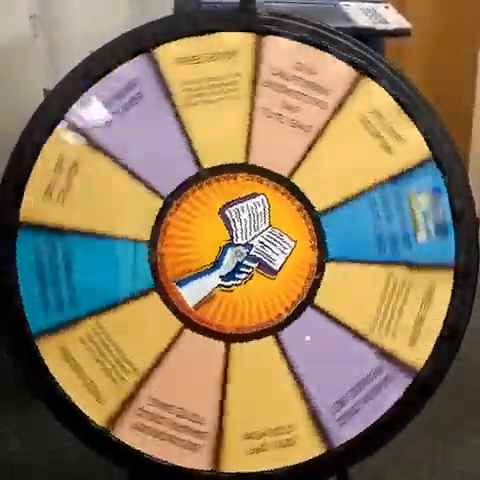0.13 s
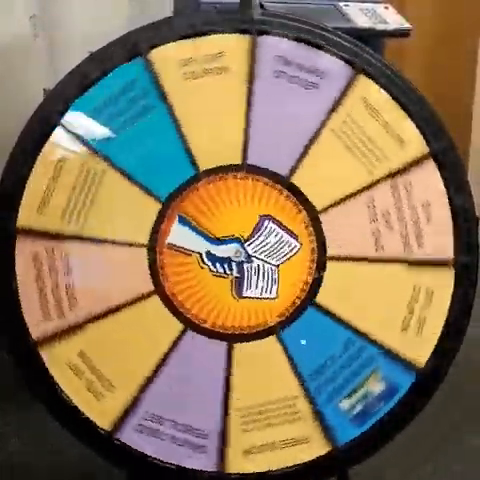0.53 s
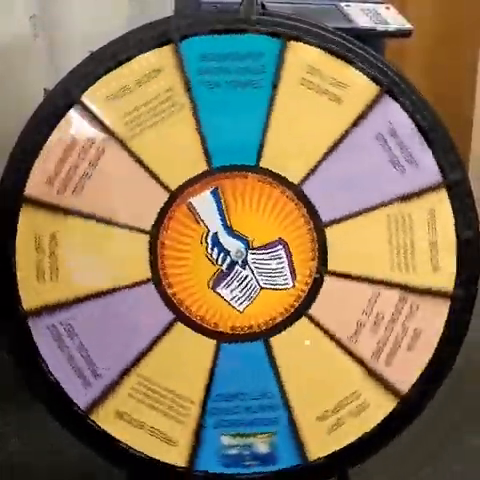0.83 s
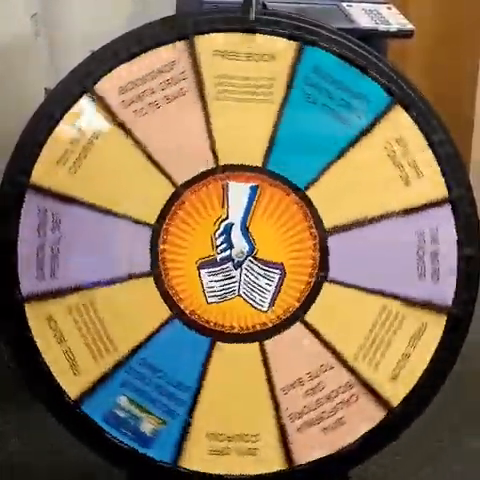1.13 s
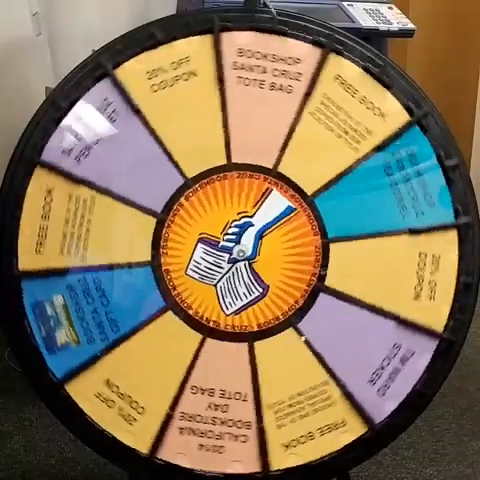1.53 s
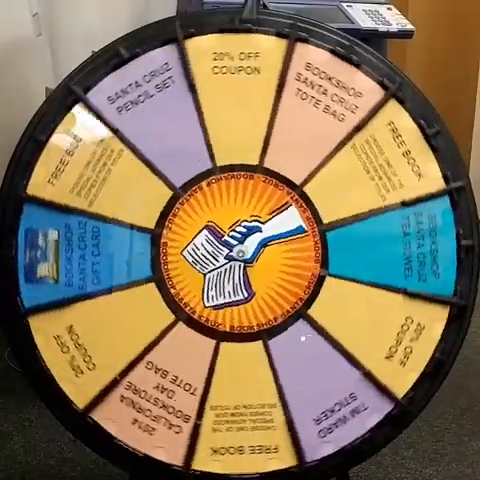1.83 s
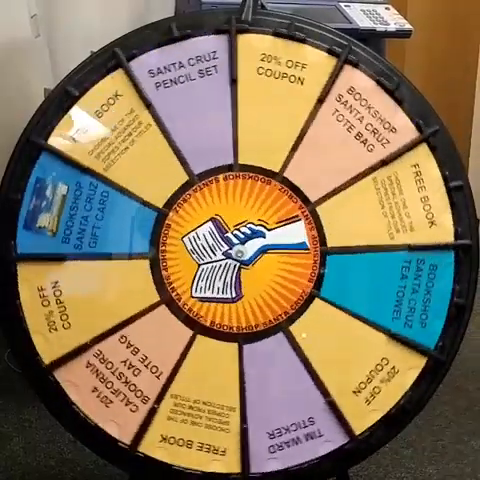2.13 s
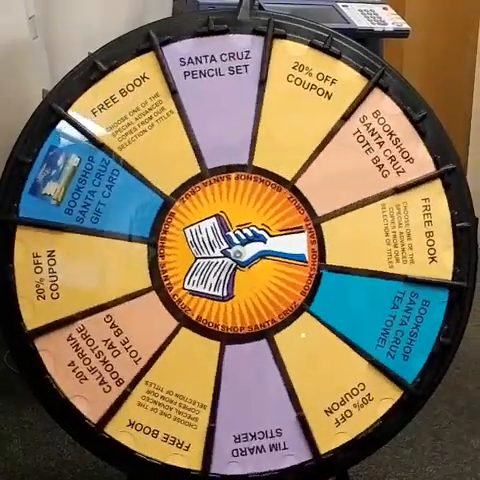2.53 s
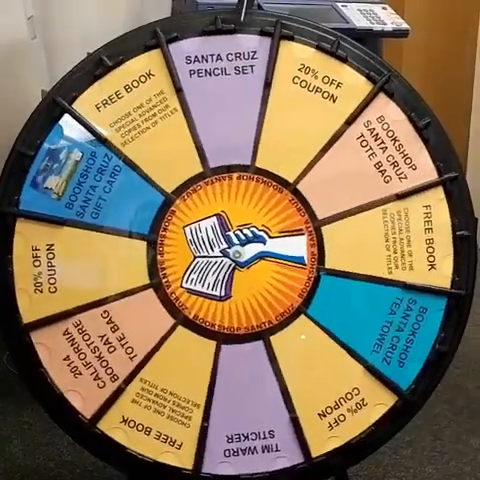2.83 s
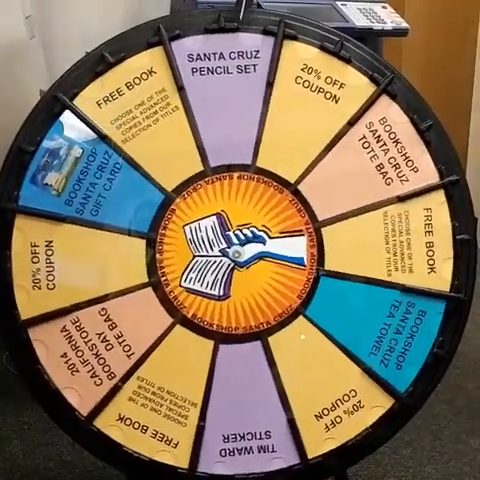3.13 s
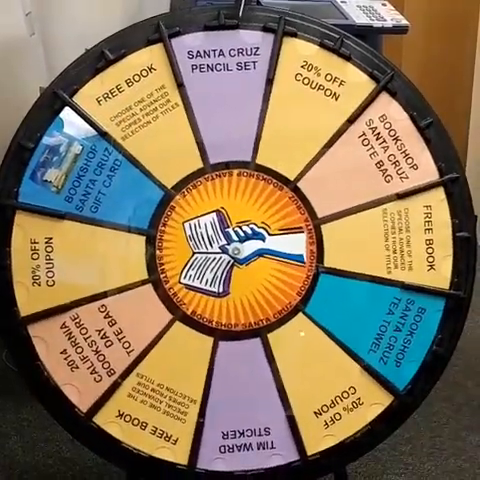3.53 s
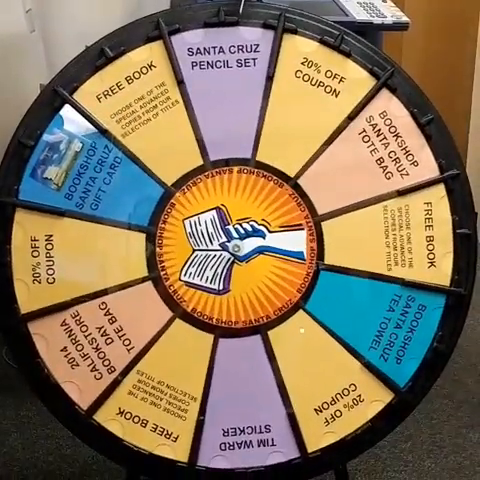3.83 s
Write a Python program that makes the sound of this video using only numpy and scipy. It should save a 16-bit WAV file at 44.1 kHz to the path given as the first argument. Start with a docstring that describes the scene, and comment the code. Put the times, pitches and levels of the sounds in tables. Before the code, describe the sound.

Prize wheel clacking about eleven times a second, slowing to single weakening ticks with boinging twangs, then near silence with faint hand rubs; close stereo microphones, left side muffled and right bright, over low room rumble.

```python
"""Prize wheel coasting to rest

In a small, hard room each peg strikes a plastic flapper, which bounces once, bends, slips off with a tick and twangs.
Contacts are shaped noise bursts with reverberation; the twang is two damped sines with wall echoes. Strikes weaken
as the wheel slows, while the twang, after softer first ones, stays about as strong: the bend is always the same.
Bearing and air rumble are filtered noise; soft low thumps, a dull knock and faint handling complete the scene.
The left of the two microphones is muffled."""
import sys
import numpy as np
from scipy import signal
from scipy.fft import rfft, irfft, next_fast_len
from scipy.io import wavfile

SR = 44100
rng = np.random.default_rng(int(sys.argv[2]) if len(sys.argv) > 2 else 0)


def waveform_to_disk(signal):
    """Save audio, clipped to [-1, 1], as 16-bit WAV at the path in sys.argv[1]."""
    frames = np.transpose(np.atleast_2d(signal))
    scaled = np.clip(frames, -1, 1) * 32767
    samples = np.round(scaled).astype(np.int16)
    wavfile.write(sys.argv[1], SR, samples)


N = 176400

# Levels of events and spectra are relative: room, spectrum and microphones still act on them.
# Flapper meeting each peg: strike [t/s, level/dB], bounce [delay/s, level/dB]
PEG_STRIKES = [(-.055, -5.5, 0.013, -19), (0.028, -14, .014, -11), (.1135, -17, 0.0075, -12),
               (0.2019, -13.5, 0.0079, -13.5), (.2935, -12.5, .014, -12.5), (.3895, -13, 0.013, -14.5),
               (.504, -16.5, 0.018, -19), (.607, -17.5, 0.0095, -18.5), (0.7164, -23, 0.016, -18.5),
               (0.844, -20, 0.017, -29), (.964, -21, 0.012, -22), (1.091, -20, .014, -25.5),
               (1.230, -17.5, 0.012, -44), (1.3738, -20.5, 0.014, -20.5), (1.537, -21.5, 0.017, -20.5),
               (1.735, -20.5, .015, -23), (1.965, -29.5, .0165, -22.5), (2.288, -38, 0.016, -29.5)]
# Flapper slipping off each peg [t/s, tick level/dB, twang level/dB]
PEG_RELEASES = [(.012, -55, -10), (.098, -31, -14), (.189, -34, -14), (.272, -30, -5.5), (.365, -33, -12),
                (.456, -27, -3.5), (.557, -30, -3), (.664, -24.5, -5), (.774, -23.5, -6), (.895, -24.5, -5),
                (1.021, -23.5, -5.5), (1.160, -26.5, -4.5), (1.302, -29, -4), (1.466, -33.5, -5.5),
                (1.643, -30, -4.5), (1.851, -25.5, -5), (2.113, -30, -5.5), (2.548, -24.5, -5)]
# Dull knocks as the wheel settles [t/s, level/dB]
SETTLING_KNOCKS = [(3.1465, -34.5), (3.251, -56), (3.537, -47), (3.633, -50.5)]
# Bending modes of the flapper before detuning [f/Hz, level/dB, attack/s, hold/s, t60/s]
FLAPPER_MODES = [(625.2, -20, .004, 0.0038, 0.058), (301, -26, 0.011, 0.0033, 0.038)]
# Drive of each mode by a strike, relative to the strike [mode 1 level/dB, mode 2 level/dB]
STRIKE_DRIVE_DB = (-3, 5)
# Wall echoes of the twang [delay/s, level/dB]
WALL_ECHOES = [(.038, -14.5), (.060, -13.5)]
# Light brushes of a hand [t/s, level/dB, attack/s, hold/s, t60/s, treble tilt/(dB per octave)]
HAND_BRUSHES = [(2.40, -65, 0.011, .03, .1, 3), (3.09, -66, 0.034, .02, .1, 1),
                (3.175, -57.5, .01, .02, .1, 3), (3.334, -76, 0.054, .08, .3, -2),
                (3.471, -67.5, 0.061, .07, 0.25, 0.5), (3.575, -63, .01, 0.0085, .1, 3),
                (3.694, -62.5, 0.0031, 0.0066, 0.06, 10.5), (3.823, -52.5, 0.014, 0.015, 0.069, 5.5),
                (3.904, -60, 0.0056, 0.016, 0.1, 2.5)]
# Soft low thumps [t/s, level/dB]
LOW_THUMPS = [(0.227, -34.5), (1.069, -43), (1.673, -42), (2.303, -37)]
# Spectra of strike, tick, knock and hand brush [f/Hz, level/dB]
STRIKE_SPECTRUM = [(100, -22.5), (300, -24), (700, 2.5), (950, -10), (1300, -1.5), (1900, -7.5), (2600, -2),
                   (3100, -4), (3800, 1), (5000, -3), (7000, 2.5), (10400, -5), (11600, 3.5), (15500, -7.5)]
TICK_SPECTRUM = [(200, -10.5), (1000, 1), (1400, 4), (1800, 4.5), (2050, 6), (2400, -2.5), (3500, -0.5),
                 (5000, -1), (6100, 1.5), (7700, 2.5), (10400, -8.5), (15500, -9.5)]
KNOCK_SPECTRUM = [(150, 0), (450, 11.5), (720, 12), (1050, 17), (1500, 0.5), (2200, 5.5), (2700, 2),
                  (3600, -0.5), (7000, -5.5), (10400, -13.5), (15500, -29)]
BRUSH_SPECTRUM = [(300, 26), (1500, 7), (4000, 0), (8000, -0.5), (15500, -12.5)]
# Spectra of ventilation and of the turning wheel's rumble [f/Hz, level/dB]
AIR_SPECTRUM = [(20, -52), (40, -24), (58, 3), (85, -0.5), (135, 1.5), (280, -4), (600, -2), (850, -12),
                (1200, -18), (2500, -33.5), (6000, -38.5), (15500, -46.5)]
AXLE_SPECTRUM = [(20, -47.5), (40, -13.5), (60, 6), (100, -1.5), (145, 1), (220, -10.5), (500, -1),
                 (1000, -11.5), (4000, -33.5)]
# Reverberation time of the room [f/Hz, t60/s]
REVERBERATION = [(300, .45), (1500, 0.27), (4000, 0.39), (8000, 0.29), (14000, 0.17)]
# Difference between the microphones in a diffuse field [f/Hz, side level/dB]
SIDE_LEVELS = [(60, 2), (130, -12.5), (300, -19), (650, 2), (1200, 0.5)]
# Microphone responses [f/Hz, left level/dB, right level/dB]
MIC_RESPONSES = [(59.5, 2.5, -1.5), (162, -5, 0.5), (324, -0.5, 1.5), (590, -10, 3.5), (1000, -15, -4),
                 (2000, -15, -1.5), (3220, -15.5, -2), (4400, -31.5, -2.5), (6700, -23, -1.5),
                 (7050, -27, -1.5), (9140, -43.5, -7), (9360, -23, 1.5), (10440, -16.5, 15.5),
                 (11180, -29.5, 7.5), (13000, -32, 1), (15500, -31, 4)]

LEAD_S = 0.2  # lead-in for what is already ringing
CLICK_ATTACK_S, CLICK_HOLD_S, CLICK_T60_S = 0.00014, 0.0018, 0.019
CLICK_PATCHY_DB, CHATTER_GRAIN = 1.5, 0.3  # chance spectral peaks; unevenness of the chatter (nepers)
RING_SHARE = 0.6  # energy share of reverberation that keeps the contact's ring; the rest is a plain crack
DIRECT_DB = 2  # sound straight from the flapper
ROOM_DB, TWANG_ROOM_DB = 7.5, -8.5  # reverberation of contacts and hands; of the twang
ROOM_BUILD_S, ROOM_GRAIN = 0.008, 0.25  # build-up time; unevenness of the reflections (nepers)
TWANG_LAG_S = 0.012
TWANG_SHARP, TWANG_SETTLE_S = 0.15, 0.0061  # initial fractional sharpness and its time constant
TWANG_DETUNE = 0.018  # fractional scatter of pitch from pluck to pluck
THUMP_HZ, THUMP_ATTACK_S, THUMP_T60_S = 60, 0.018, 0.16
AIR_DB, AIR_SPREAD, HUM_HZ, HUM_DB = -32.5, 0.8, 65.3, -63
AXLE_DB, STOPS_S = -27.5, 2.9
LEFT_LAG_S, TOP_HZ = 0.00017, 15900


def undb(db):
    """Amplitude gain is ten to the power of level over twenty."""
    return 10 ** (np.asarray(db) / 20)


def curve(points, hz):
    """Interpolation on a logarithmic frequency axis."""
    p = np.array(points, float)
    return np.interp(np.log(hz + 1), np.log(p[:, 0]), p[:, 1])


def colour(x, points, tilt_db=0, patchy_db=0):
    """Minimum-phase filtering: folding the cepstrum turns a magnitude response into a causal filter."""
    size = next_fast_len(x.shape[-1] // 2 + 2048) * 2
    hz = np.arange(size // 2 + 1) * SR / size
    peaks = np.interp(hz, np.linspace(0, SR / 2, 48), rng.standard_normal(48))
    tilt = tilt_db * np.log2((hz + 500) / 5000)
    db = curve(points, hz) + tilt + patchy_db * peaks
    cepstrum = irfft(np.log(undb(db)))
    cepstrum[1:size // 2] *= 2
    cepstrum[size // 2 + 1:] = 0
    response = np.exp(rfft(cepstrum))
    return irfft(rfft(x, size) * response)[..., :x.shape[-1]]


def seconds(length):
    """Uniform sampling of time."""
    return np.arange(int(length * SR)) / SR


def envelope(t, attack, hold, t60):
    """Exponential damping, by 60 dB in t60, after a linear attack and a hold."""
    decay = np.exp(-np.log(1000) * np.maximum(t - attack - hold, 0) / t60)
    return np.clip(t / attack, 0, 1) * decay


def track():
    """Stereo silence, including the lead-in."""
    return np.zeros((2, N + int(LEAD_S * SR)))


def add(out, at, x):
    """Linear superposition of a sound at a given time."""
    i = max(int((at + LEAD_S) * SR), 0)
    out[:, i:i + x.shape[-1]] += x[..., :out.shape[1] - i]


def diffuse(size, grain=0, spread=1):
    """Diffuse field: noise from all directions, split into common and opposed parts at two microphones."""
    # A new chance level every 40 samples makes the noise grainy.
    flicker = np.repeat(rng.standard_normal(size // 40 + 1), 40)[:size]
    mid, side = rng.standard_normal((2, size)) * np.exp(grain * flicker)
    hz = np.arange(size // 2 + 1) * SR / size
    side = spread * irfft(rfft(side) * undb(curve(SIDE_LEVELS, hz)), size)
    return np.array([mid + side, mid - side]) / np.sqrt(2)


def room():
    """Reverberation: dense reflections build up quickly, then decay per band, fastest at the very top."""
    t = seconds(0.4)
    hz = np.arange(len(t) // 2 + 1) * SR / len(t)
    spectrum = rfft(diffuse(len(t), ROOM_GRAIN))
    tail = 0
    for band_hz, t60 in REVERBERATION:
        share = curve([(f, f == band_hz) for f, _ in REVERBERATION], hz)
        band = irfft(spectrum * share, len(t))
        tail = tail + band * envelope(t, ROOM_BUILD_S, 0, t60)
    return tail / np.sqrt(np.sum(tail ** 2) / 2)


def ventilation():
    """Broadband flow noise: a steady rumble of air, with a faint pure hum."""
    size = track().shape[1]
    hum = undb(HUM_DB) * np.sin(2 * np.pi * HUM_HZ * np.arange(size) / SR)
    return undb(AIR_DB) * colour(diffuse(size, spread=AIR_SPREAD), AIR_SPECTRUM) + hum


def axle():
    """Bearing friction noise: its power falls in proportion to the wheel's speed."""
    t = np.arange(track().shape[1]) / SR - LEAD_S
    speed = np.clip(1 - t / STOPS_S, 0, None)
    return undb(AXLE_DB) * np.sqrt(speed) * colour(diffuse(len(t)), AXLE_SPECTRUM)


def click(db, points, walls):
    """Impact excitation: hard plastic chatters for milliseconds and the room answers; no two ring quite alike."""
    t = seconds(0.02)
    shape = envelope(t, CLICK_ATTACK_S, CLICK_HOLD_S, CLICK_T60_S)
    grain = np.exp(CHATTER_GRAIN * rng.standard_normal(len(t)))
    chatter = rng.standard_normal(len(t)) * grain * shape
    chatter = chatter / np.linalg.norm(chatter)
    ring = signal.fftconvolve(walls[0], chatter[None], axes=1)[:, :walls[0].shape[1]]
    crack = walls[1]
    share = np.clip(RING_SHARE, 0, 1)
    sound = undb(ROOM_DB) * (np.sqrt(share) * ring + np.sqrt(1 - share) * crack)
    sound[:, :len(t)] += undb(DIRECT_DB) * chatter
    return undb(db) * np.linalg.norm(shape) * colour(sound, points, patchy_db=CLICK_PATCHY_DB)


def flapper_clicks(walls):
    """Successive impacts: strike and bounce on each peg, a tick on leaving it, and the last dull knocks."""
    out = track()
    for at, db, lag, bounce_db in PEG_STRIKES:
        add(out, at, click(db, STRIKE_SPECTRUM, walls))
        add(out, at + lag, click(bounce_db, STRIKE_SPECTRUM, walls))
    for at, tick_db, _ in PEG_RELEASES:
        add(out, at, click(tick_db, TICK_SPECTRUM, walls))
    for at, db in SETTLING_KNOCKS:
        add(out, at, click(db, KNOCK_SPECTRUM, walls))
    return out


def flapper_twang():
    """Free vibration: freed or struck, the flapper rings in two modes that start sharp; the walls repeat it."""
    out, t = track(), seconds(0.2)
    warped = t + TWANG_SHARP * TWANG_SETTLE_S * (1 - np.exp(-t / TWANG_SETTLE_S))
    plucks = [(at, db, (0, 0)) for at, _, db in PEG_RELEASES]
    plucks += [(at, db, STRIKE_DRIVE_DB) for at, db, _, _ in PEG_STRIKES]
    for at, db, drive in plucks:
        pitch = 1 + TWANG_DETUNE * rng.standard_normal()
        ring = np.zeros(len(t))
        for (hz, mode_db, attack, hold, t60), drive_db in zip(FLAPPER_MODES, drive):
            mode = envelope(t, attack, hold, t60) * np.sin(2 * np.pi * hz * pitch * warped)
            ring += undb(mode_db + drive_db) * mode
        add(out, at + TWANG_LAG_S, undb(db) * ring)
        for lag, echo_db in WALL_ECHOES:
            add(out, at + TWANG_LAG_S + lag, undb(db + echo_db) * ring)
    return out


def thumps():
    """Damped oscillation: soft, deep bumps of a single low sine."""
    out, t = track(), seconds(0.4)
    bump = envelope(t, THUMP_ATTACK_S, 0, THUMP_T60_S) * np.sin(2 * np.pi * THUMP_HZ * t)
    for at, db in LOW_THUMPS:
        add(out, at, undb(db) * bump)
    return out


def handling():
    """Friction noise: short, faint rubs of a hand, as filtered noise bursts."""
    out, t = track(), seconds(0.3)
    for at, db, attack, hold, t60, tilt_db in HAND_BRUSHES:
        rub = rng.standard_normal(len(t)) * envelope(t, attack, hold, t60)
        add(out, at, undb(db) * colour(rub, BRUSH_SPECTRUM, tilt_db=tilt_db))
    return out


def scene():
    """Superposition of direct sound, reverberation and background, with the lead-in cut off."""
    walls = (room(), room())
    hands, twang = handling(), flapper_twang()
    sent = undb(ROOM_DB) * hands + undb(TWANG_ROOM_DB) * twang
    wet = signal.fftconvolve(sent, walls[0], axes=1)[:, :hands.shape[1]]
    flapper = flapper_clicks(walls) + twang
    background = thumps() + axle() + ventilation()
    return (flapper + hands + wet + background)[:, -N:]


def record(dry):
    """Transducer response: the right port rings in the high treble, the left is muffled and lags; the top is cut."""
    heard = []
    for k in range(2):
        response = [(row[0], row[k + 1]) for row in MIC_RESPONSES]
        heard.append(colour(dry[k], response))
    heard = np.array(heard)
    heard[0] = np.roll(heard[0], int(LEFT_LAG_S * SR))
    top_cut = signal.ellip(10, 0.2, 80, TOP_HZ, fs=SR, output="sos")
    return signal.sosfilt(top_cut, np.clip(heard, -1, 1))


dry = scene()
out = record(dry)
waveform_to_disk(out)
```